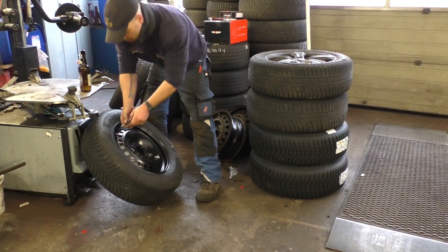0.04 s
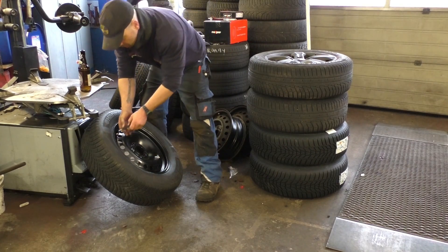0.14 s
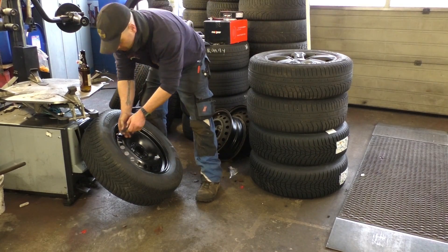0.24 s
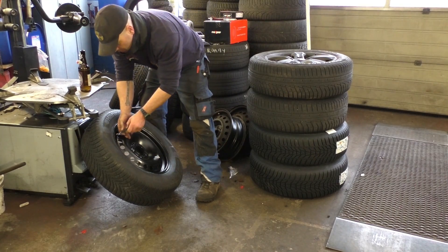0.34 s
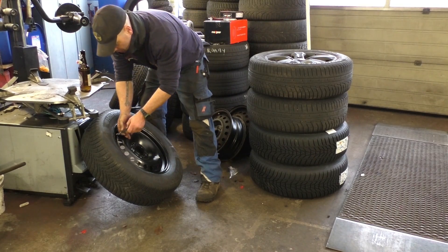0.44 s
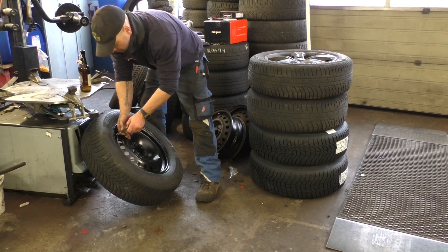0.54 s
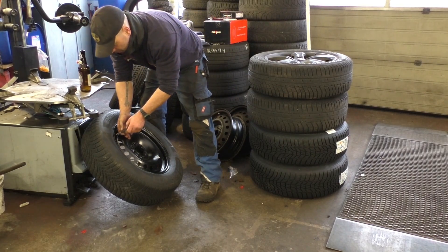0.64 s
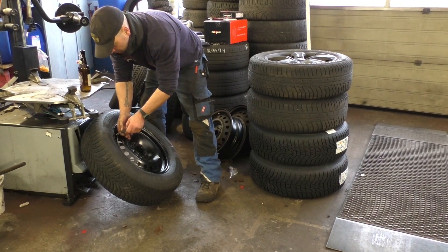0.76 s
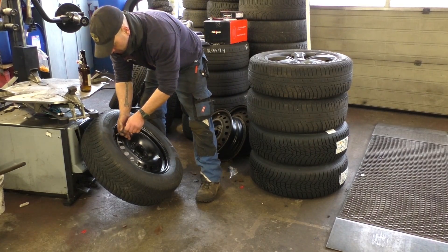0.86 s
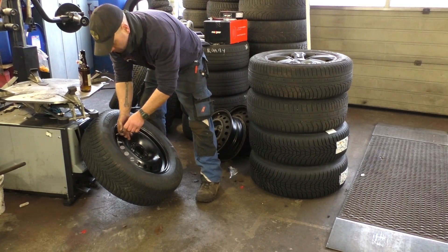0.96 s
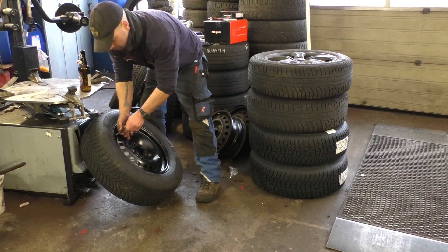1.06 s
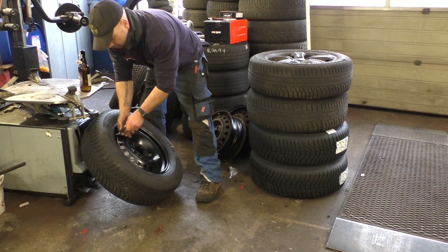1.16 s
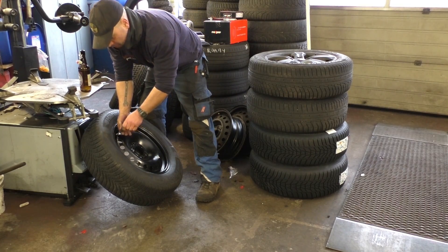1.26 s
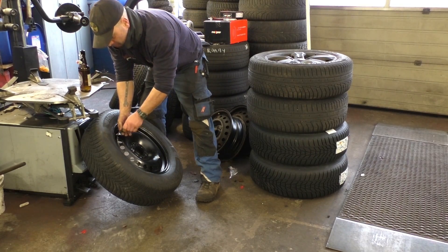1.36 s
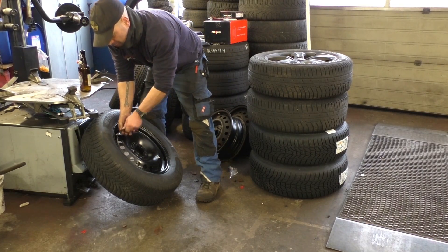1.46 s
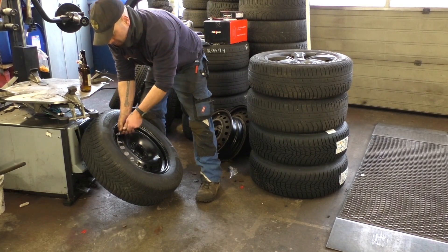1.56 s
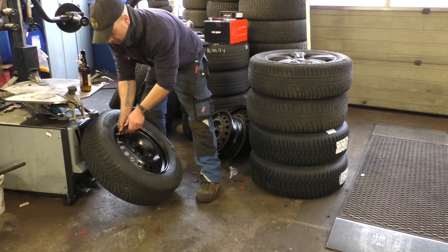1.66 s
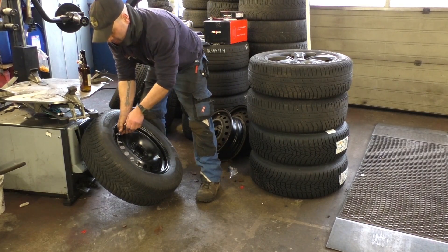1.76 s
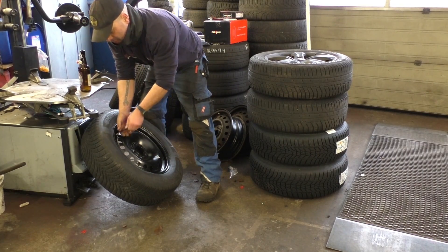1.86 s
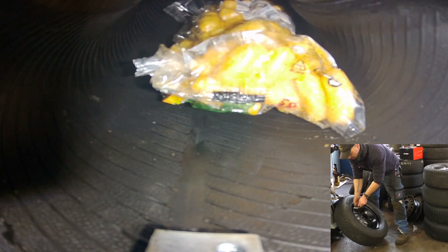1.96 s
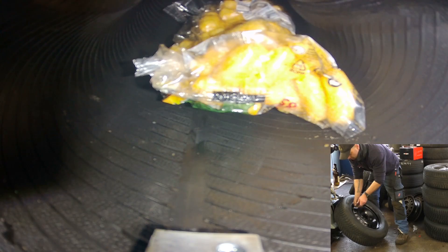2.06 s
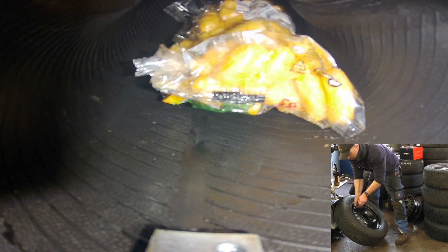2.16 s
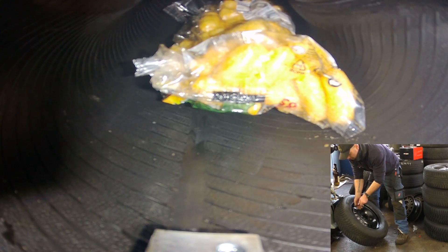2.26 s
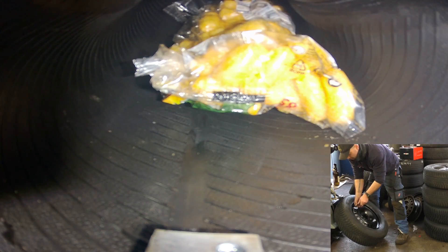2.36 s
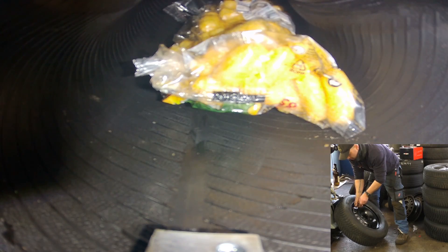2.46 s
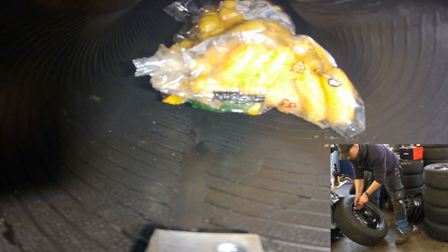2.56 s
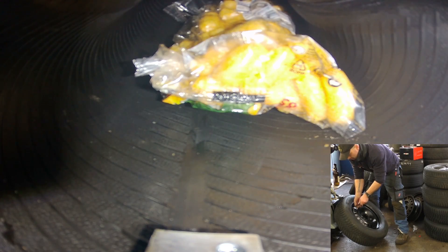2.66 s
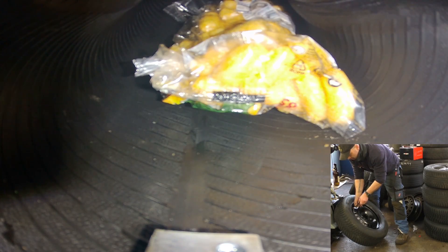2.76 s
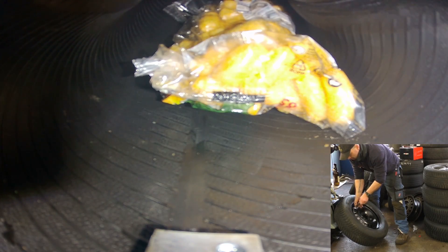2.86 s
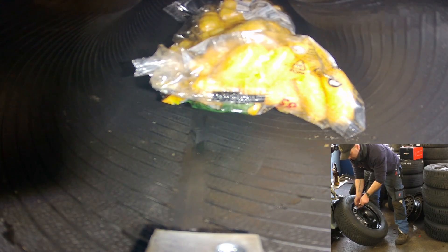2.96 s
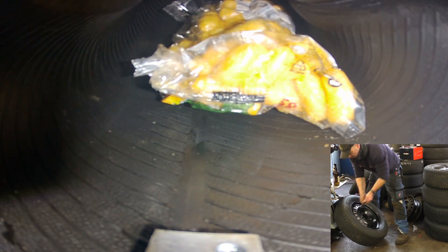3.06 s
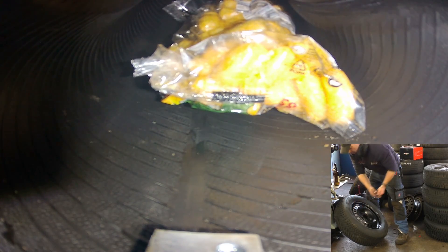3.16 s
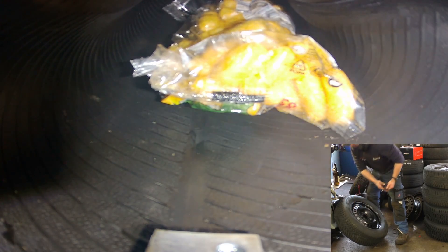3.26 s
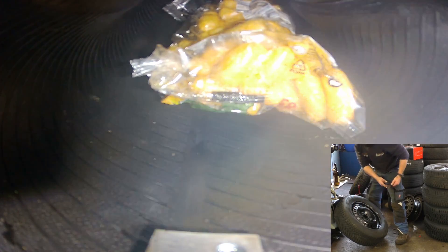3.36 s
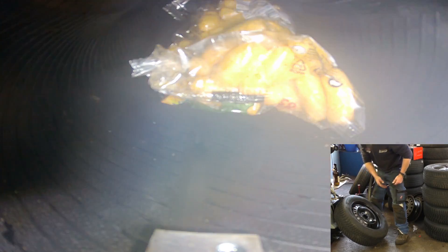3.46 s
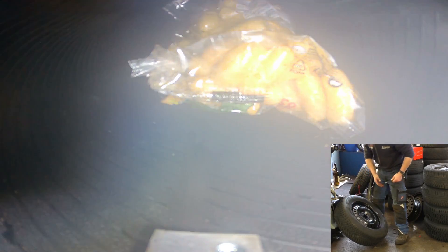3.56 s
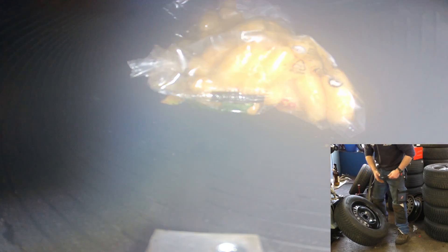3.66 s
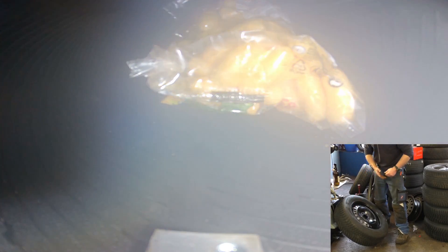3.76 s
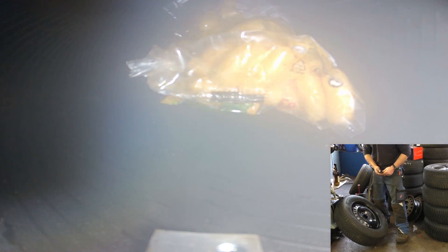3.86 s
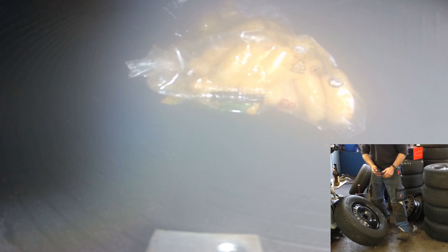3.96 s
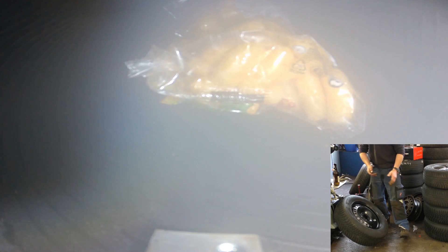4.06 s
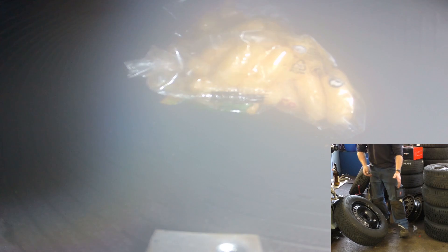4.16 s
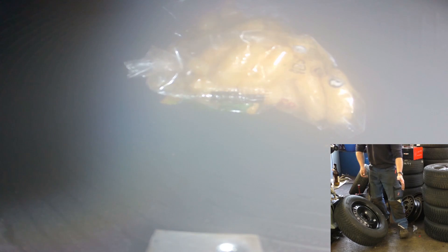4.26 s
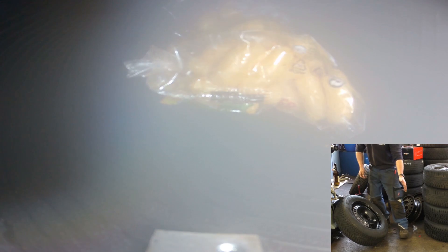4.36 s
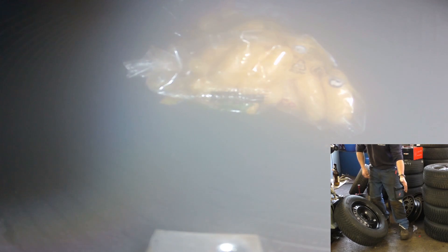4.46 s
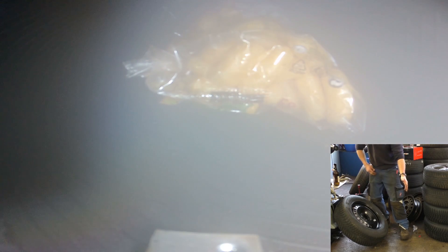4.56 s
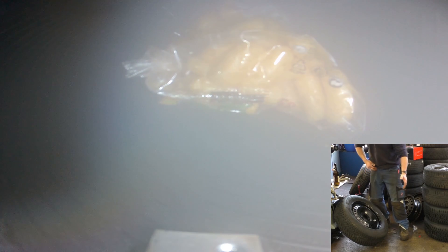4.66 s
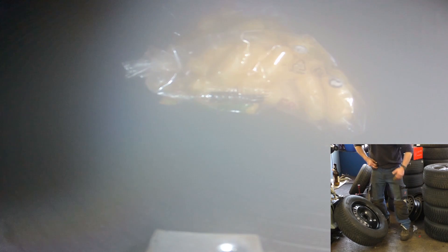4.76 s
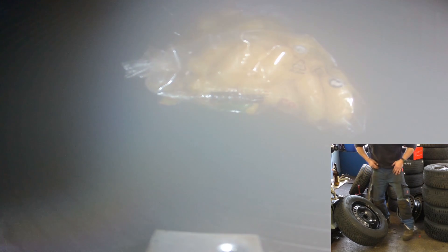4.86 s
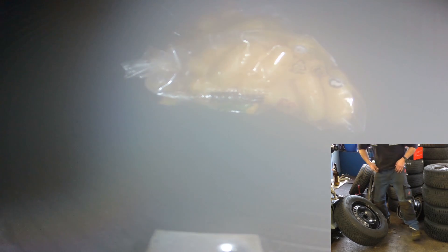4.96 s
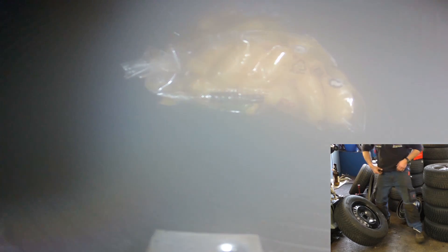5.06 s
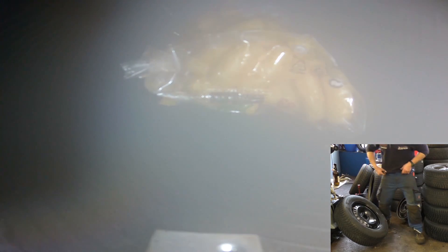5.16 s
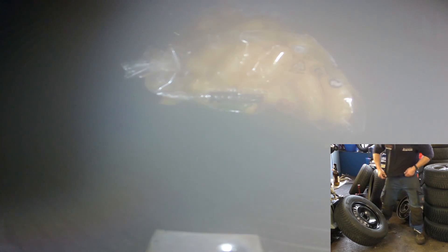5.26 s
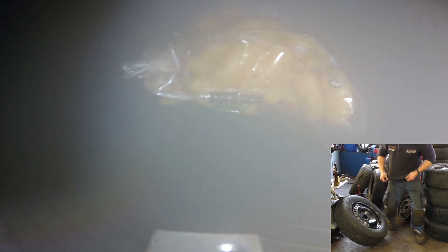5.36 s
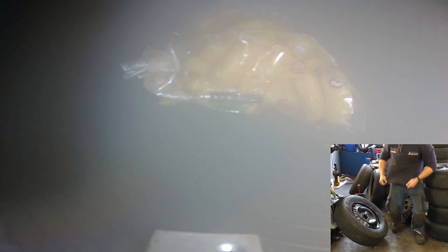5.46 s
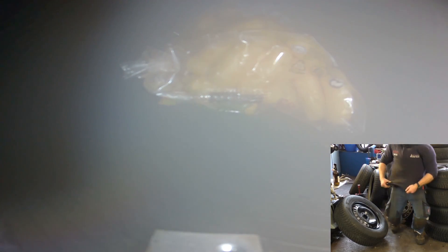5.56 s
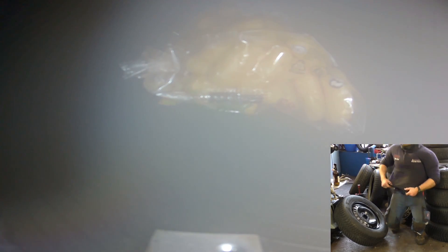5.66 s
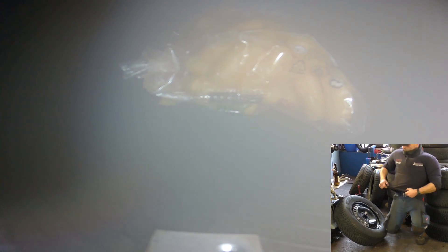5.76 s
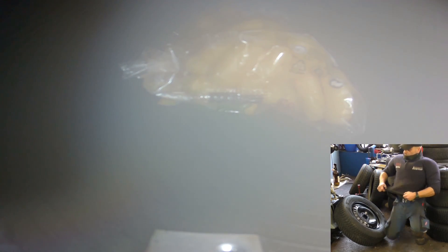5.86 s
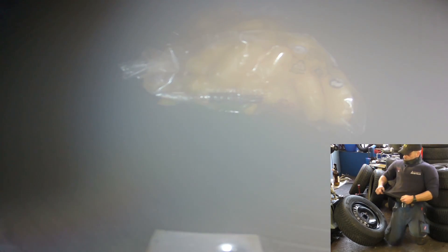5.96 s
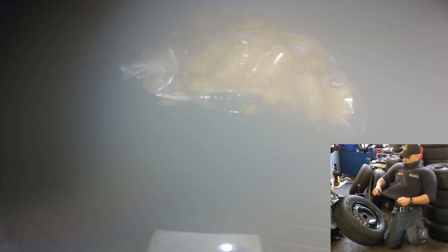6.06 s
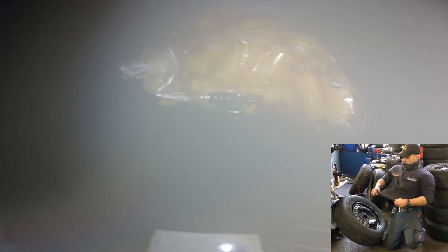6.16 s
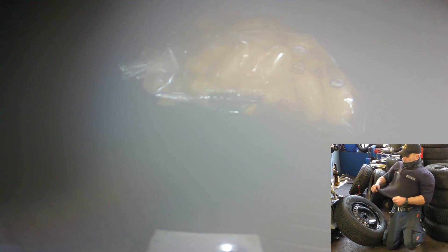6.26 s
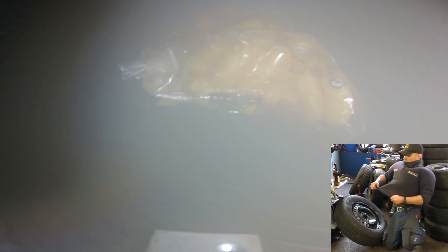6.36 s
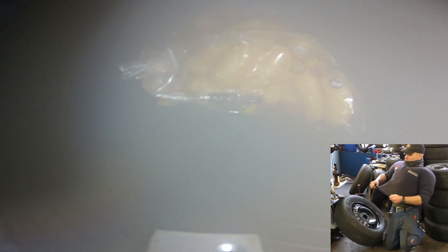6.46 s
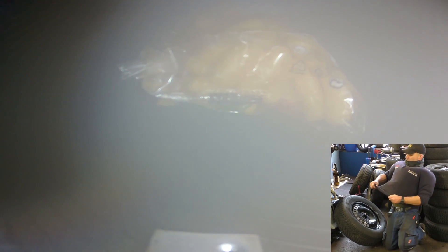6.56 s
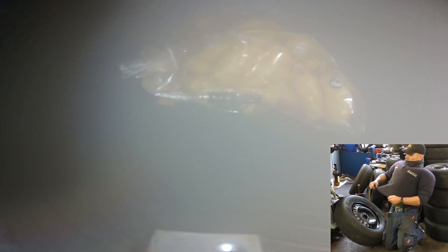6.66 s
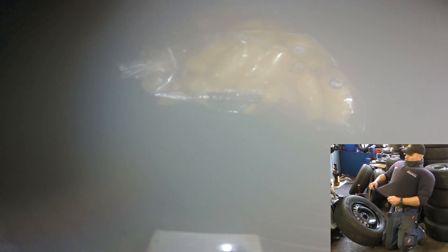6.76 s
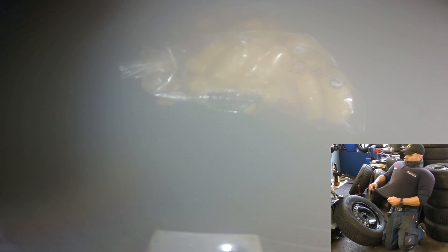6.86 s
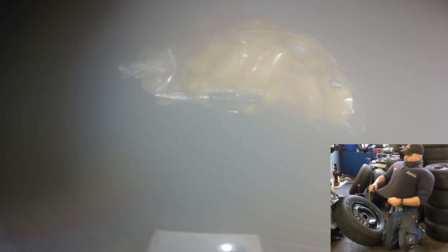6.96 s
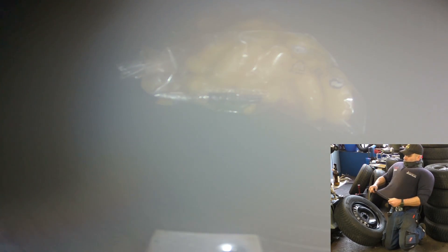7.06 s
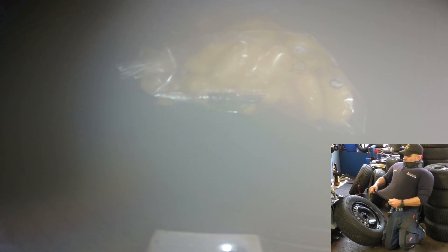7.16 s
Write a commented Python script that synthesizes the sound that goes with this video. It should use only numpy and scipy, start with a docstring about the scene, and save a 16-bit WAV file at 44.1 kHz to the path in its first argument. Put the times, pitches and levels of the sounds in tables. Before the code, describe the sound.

A tyre is deflated in a workshop, heard from inside it and from the room at once. At first there is low rumble, a faint drone and clothes shuffling. A valve tool knocks around 0.3, 0.65, 0.8, 1.05 and 1.4 seconds, each hit ringing short and hollow in the wheel, followed by a small tick in the room, some with a spit of air. From 1.6 seconds a thin, high leak fizzes and wavers. A strong knock at 2.8 leads to a sharp pop at 2.9, slightly left, and a blast of air. The jet swells at 3.1 with heavy low thumps and gusts buffeting the microphones until about 3.4, weaker ones after. Then a loud, bright, steady hiss with an airy whistle and soft hollow resonance continues, very slowly weakening, with faint knocks underneath until it ends at about 7.2 seconds.

```python
"""In a workshop a tyre is let down, taken by two microphones mixed together: one inside it, one in the room.
A valve tool knocks the wheel, the core leaks, then pops out and the jet hisses steadily as it slowly sags.
Inside, each knock rings the modes of wheel and air, and flow noise rings the hollow and the stem.
Outside, in stereo, shaped noise makes ticks, jet and workshop; low pushes and gusts buffet the ports."""
import sys
import numpy as np
from scipy import signal
from scipy.fft import rfft, irfft, next_fast_len
from scipy.io import wavfile
from scipy.ndimage import uniform_filter1d, map_coordinates

SR = 44100
rng = np.random.default_rng(int(sys.argv[2]) if len(sys.argv) > 2 else 0)


def wav_out(sig):
    """Save sig, one row per channel (or a flat mono array), as 16-bit PCM at SR to the path in sys.argv[1]."""
    wavfile.write(sys.argv[1], SR, np.round(np.clip(np.atleast_2d(sig).T, -1, 1) * 32767).astype(np.int16))


N = 318402

# Likeness of left and right at the room microphone: hz, likeness (1 is the same on both sides)
LEFT_RIGHT_LIKENESS = [(300, 1), (700, 1), (1100, 0.98), (2500, 0.43), (5200, 0.6), (5900, 0.96), (8200, 1),
                       (9000, 0.75), (15000, .55)]

POP_S = 2.906  # the core leaves the valve
SURGE_S = 3.09  # the flow swells once as the tool is pulled clear
SAG_DB_PER_S = 0.71  # the pressure falls slowly
VALVE_PAN_DB = 0.8  # left over right: the valve is left of centre


def amp(db):
    """Gain of a level in dB."""
    return 10 ** (np.asarray(db) / 20)


def unit(x):
    """x at rms 1."""
    return x / np.sqrt(np.mean(x ** 2) + 1e-20)


def along(points, hz):
    """(Hz, value) points read at hz along a log frequency axis."""
    f, v = np.transpose(points)
    return np.interp(np.log(hz + 1), np.log(f + 1), v)


def curves(rows):
    """One value per sample for each column after the time."""
    s, *columns = np.transpose(rows)
    return [np.interp(np.arange(N) / SR, s, column) for column in columns]


def wobble(rate):
    """A smooth random curve with rate knots a second."""
    knots = rng.standard_normal(int(N * rate / SR) + 4)
    return map_coordinates(knots, [np.arange(N) * rate / SR])


def filtered(x, response):
    """x through a response of frequency, real or complex."""
    n = x.shape[-1]
    m = next_fast_len(n + 8192)
    return irfft(rfft(x, m) * response(np.fft.rfftfreq(m, 1 / SR)), m)[..., :n]


def above(edge_hz):
    """Steep bass cut."""
    return lambda f: f ** 4 / (f ** 4 + edge_hz ** 4)


def resonances(modes):
    """Causal response of summed (Hz, width Hz, dB) resonances, alternating in sign."""
    def response(f):
        total = 0
        for k, (centre, width, db) in enumerate(modes):
            damping = 1j * f * width
            total = total + (-1) ** k * amp(db) * damping / (centre * centre - f * f + damping)
        return total
    return response


def panned(db):
    """Left and right gains for a level difference, left over right."""
    return amp(np.array([db / 2, -db / 2]))


def rush(spectrum, likeness, patchy_db=1.):
    """Stereo noise of rms 1, shaped in frequency, with patches of random gain in time and frequency."""
    z = signal.stft(rng.standard_normal((2, N)), nperseg=512)[2]
    patches = uniform_filter1d(rng.standard_normal(z.shape[1:]), 6, 0)
    patches = uniform_filter1d(patches, 12, 1)
    pair = signal.istft(z * amp(patchy_db * unit(patches)), nperseg=512)[1][:, :N]

    def mid_side(hz):
        # the angle shares the power so that left and right correlate by the wanted likeness
        turn = np.arccos(np.clip(along(likeness, hz), -1, 1)) / 2
        return amp(along(spectrum, hz)) * [np.cos(turn), np.sin(turn)]

    mid, side = filtered(pair, mid_side)
    return unit(np.array([mid + side, mid - side]))


def settling(from_s):
    """1 while the first flow is rough, then a smooth bell-shaped fall to 0."""
    settle_s = 0.23
    return np.exp(-(np.maximum(np.arange(N) / SR - from_s, 0) / settle_s) ** 2)


def workshop():
    """Rumble, drone and far hiss of the hall, with cloth and shoes shuffling nearby, all as shaped noise."""
    # Spectra of rumble and shuffle: hz, level_db
    rumble_spectrum = [(15, -14), (30, 0.5), (70, 0), (130, 2), (300, -48)]
    shuffle_spectrum = [(50, -80), (100, -16), (140, -4), (210, 1.5), (350, 0), (500, -7), (900, -73)]
    # Spectra of drone and far hiss: hz, density_db (per Hz)
    drone_spectrum = [(260, -54), (450, -10), (621, -10), (987, -0.5), (1100, 0.5), (1630, -1.5),
                      (2400, -4.5), (2620, -3.5), (5000, -32), (6500, -64), (11000, -120)]
    hiss_spectrum = [(1760, -34), (3000, -10), (3470, -5.5), (5390, -12.5), (6790, -15), (11500, -17.5),
                     (15900, -20.5)]
    # Levels through time of rumble and of shuffle: time_s, level_db
    rumbling = [(0, -60), (.4, -71), (1.5, -65.5), (1.85, -59.5), (2.2, -69), (3.1, -62), (4.5, -67),
                (5.6, -69.5), (6.25, -82), (6.6, -68.5), (7.22, -72)]
    shuffling = [(0, -52), (.3, -60), (.75, -65), (1.55, -60.5), (1.72, -48), (2, -54.5), (2.8, -54.5),
                 (3.1, -51), (3.45, -51.5), (3.65, -63), (4.4, -62), (4.8, -73), (5.09, -61), (5.3, -82),
                 (5.95, -59.5), (6.15, -45), (6.5, -57.5), (7.22, -62.5)]
    # Levels through time of the hall: time_s, drone_db, hiss_db
    hall = [(0.0, -49, -52.3), (0.372, -58, -64.5), (0.598, -59.5, -66), (0.86, -62, -66),
            (0.982, -59, -66.8), (1.212, -57, -55), (1.412, -59, -65.5), (1.56, -60.5, -58.8)]

    (rumble_db,), (shuffle_db,) = curves(rumbling), curves(shuffling)
    drone_db, hiss_db = curves(hall)
    rumble = amp(rumble_db + 4.5 * wobble(13)) * rush(rumble_spectrum, [(50, 0.92)], patchy_db=2.5)
    shuffle = amp(shuffle_db + 1.6 * wobble(18)) * rush(shuffle_spectrum, [(200, 0.96)], patchy_db=3.5)
    drone = filtered(rush(drone_spectrum, LEFT_RIGHT_LIKENESS, patchy_db=.5), above(200))
    hiss = filtered(rush(hiss_spectrum, LEFT_RIGHT_LIKENESS, patchy_db=.5), above(900))
    return rumble + shuffle + amp(drone_db) * drone + amp(hiss_db) * hiss


def knocks():
    """Inside the tyre: each knock rings the parts of the wheel; the contact chatters and scratches briefly."""
    # Knocks of the tool: start_s, level_db, then tread_db, air_ring_db, cavity_db, sidewall_db over that level
    knock_rows = [(0.294, -42, -12, -12, -10.5, -28), (0.334, -34, -22, -18, -21, -33),
                  (0.654, -51.5, -9, -1.5, -2, -20), (0.813, -34, -7.5, -13.5, -13, -32),
                  (1.043, -23.5, -11.5, -24, -18.5, -34), (1.388, -36, -4.5, -8.5, -16, -25),
                  (1.649, -55.5, -15, -11, 5, 2), (1.746, -56, 6, -9, 7, -21),
                  (2.357, -41, -27, -10, -3, -16), (2.693, -41, -12, -14, -9.5, -18),
                  (2.827, -19, -13, -5, -14, -23), (3.483, -35.5, -14, -28, -15.5, -11),
                  (3.844, -32, -22, -21, -17.5, -14), (4.304, -29.5, -27, -19, -30, -20),
                  (5.269, -31.5, -40, -20, -12, -14), (5.296, -33.5, -13, -41, -25, -9.5),
                  (5.579, -49, -10, -22, -24, -13), (5.722, -35.5, -20, -24, -33, -20),
                  (5.954, -41, -21, -17, -19, -6), (5.972, -36, -14, -18, -20, -15),
                  (6.033, -33, -26, -13, -28, -5), (6.642, -32.5, -27, -27, -20, -21),
                  (6.82, -46.5, 0, 3, -21, -21), (6.932, -35.5, -40, -17, -19, -13)]
    # Modes of the wheel: pitch_hz, level_db, t60_s
    wheel_modes = [(144, 1, 0.17), (217.2, 0.5, 0.33), (395, 1.5, 0.38), (575, 12, 0.047), (730, -26, 0.14),
                   (819, -4, 0.058), (895, 4, 0.037), (932, -18.5, 0.39), (967.5, 8, 0.035),
                   (992, -2.5, 0.05), (1084, -3.5, 0.065), (1168, -16, 0.057), (2680, -23, 0.025),
                   (2850, -19, .03), (2840, -17, 0.055), (3050, -5, 0.063), (3260, 18.5, 0.018),
                   (3461, -6, 0.1), (3546, -1, 0.075), (3580, -6, 0.044), (5380, -22, 0.099)]
    # Pitches dividing the modes into tread, ring of air, cavity, sidewall, body and rim: edge_hz
    part_edges_hz = [180, 300, 470, 780, 2000]
    # Scratch of metal on metal at the contact: centre_hz, width_hz, level_db
    scratch_modes = [(2700, 1100, -15), (4700, 1000, -4), (6740, 830, 1), (7760, 500, -6)]
    usual_db, rim_db, grows = -31.5, -17.5, 0.84  # rim at a usual knock; growth in dB per dB of knock
    seated_s, seeking_db, seated_db = .5, -7, -30.5  # scratches more until the tool sits on the core

    out, t = np.zeros(N + SR), np.arange(SR // 2) / SR
    hz, level, t60 = np.transpose(wheel_modes)
    part = np.digitize(hz, part_edges_hz)
    luck_db = rng.standard_normal((len(knock_rows), len(wheel_modes)))
    chatter = rng.standard_normal((len(knock_rows), SR // 50)) * amp(-30 - 60 * t[:SR // 50] / .03)
    chatter[:, 0] = 1
    chatter[:, round(.0052 * SR)] = 0.18  # the tool bounces once
    grit = unit(filtered(rng.standard_normal((len(knock_rows), len(t))), resonances(scratch_modes)))
    grit = grit * amp(-60 * t / 0.043)
    ring_rise = 1 - np.exp(-t / (0.0024 + 0.64 / hz[:, None]))  # low modes take longer to build up
    scratch_rise = 1 - np.exp(-t / 0.0018)
    for row, luck, contact, noise in zip(knock_rows, luck_db, chatter, grit):
        s, db, tread, air, cavity, sidewall = row
        harder_db = grows * (db - usual_db)
        rim = rim_db + harder_db
        scratch_db = seeking_db if s < seated_s else seated_db + harder_db
        strength = level + np.array([tread, air, cavity, sidewall, 0, rim])[part] + luck
        decay = amp(strength[:, None] - 60 * t / t60[:, None])
        ring = decay * np.sin(2 * np.pi * hz[:, None] * t) * ring_rise
        knock = signal.fftconvolve(ring.sum(0), contact)[:len(t)]
        knock = knock + amp(scratch_db) * noise * scratch_rise
        out[round(s * SR):][:len(t)] += amp(db) * knock
    return filtered(out[:N], above(70))


def walls():
    """A fresh stereo room tail of noise, left energy 1; each frequency dies at its own speed."""
    # Decay of the room: hz, t60_s
    wall_decay = [(500, 1), (2000, 0.35), (7000, 0.55), (15000, 0.35)]
    hz, t, z = signal.stft(rng.standard_normal((2, SR // 2)), SR, nperseg=256)
    decay = amp(-60 * t / along(wall_decay, hz)[:, None])
    tail = signal.istft(z * decay, SR, nperseg=256)[1][:, :SR // 2]
    return tail / np.linalg.norm(tail[0])


def ticks():
    """The tool on the valve from the room: a noise clack, a thin whistling leak, a spit of air, and the walls."""
    # Ticks: start_s, level_db, then leak_db and spit_db over that level
    tick_rows = [(0.3738, -55.5, -7, -22), (0.413, -45.5, -10.5, -18), (0.7294, -69.5, -29, -20),
                 (0.8936, -49, -38, -25), (1.1235, -41, -29, 3), (1.468, -55, -30, -19),
                 (1.568, -46, -27, -0.5)]
    # Spectrum of the clack: hz, level_db
    clack_spectrum = [(300, -1), (800, -27), (1100, 16), (1500, 3), (2500, -18), (4500, -4), (5500, -17),
                      (9000, -8), (16000, -9)]
    # Air leaking past the tool: centre_hz, width_hz, level_db
    leak_modes = [(6900, 500, -3), (7130, 280, -2), (9300, 400, -7)]
    # A puff past the seal: centre_hz, width_hz, level_db
    spit_modes = [(4200, 800, 5.5), (9130, 820, 11.5), (14600, 4000, -2)]
    room_db = 2.5  # walls over the direct sound

    out, t = np.zeros((2, N + SR)), np.arange(SR // 2) / SR
    snap = 1 + 1.5 * amp(-60 * t / .006)  # the first instant is the hardest
    for s, db, leak_db, spit_db in tick_rows:
        noise = rng.standard_normal((3, len(t)))
        clack = unit(filtered(noise[0], lambda f: amp(along(clack_spectrum, f)))) * amp(-60 * t / 0.055)
        leak = unit(filtered(noise[1], resonances(leak_modes))) * amp(leak_db - 60 * t / 0.27)
        spit = unit(filtered(noise[2], resonances(spit_modes))) * amp(spit_db - 60 * t / 0.12)
        direct = amp(db) * (clack + leak + spit) * snap
        echo = amp(room_db) * signal.fftconvolve(direct[None], walls(), axes=1)[:, :len(t)]
        out[:, round(s * SR):][:, :len(t)] += panned(VALVE_PAN_DB)[:, None] * direct + echo
    return out[:, :N]


def nearby(x):
    """Echoes of the hall comb the jet finely; the response, direct sound included, has energy 1."""
    echo_db, t60_s, delay_s = -8.5, .25, .01  # echo level is against the direct sound
    t = np.arange(SR // 2) / SR
    tail = rng.standard_normal(len(t)) * amp(-60 * t / t60_s) * (t > delay_s)
    tail = amp(echo_db) * tail / np.linalg.norm(tail)
    tail[0] = 1  # direct sound
    return signal.fftconvolve(x, tail[None] / np.linalg.norm(tail), axes=1)[:, :N]


def jet():
    """Turbulent noise at the valve: a leak past the core, a blast as it leaves, a flow that swells and sags."""
    # The leak as the core is unscrewed: time_s, fizz_db, body_db
    leaking = [(1.575, -45.5, -48.5), (1.66, -38.5, -47.5), (1.69, -35.5, -40), (1.733, -32, -37.5),
               (1.937, -33.5, -41), (2.055, -39.5, -45), (2.215, -41, -47.5), (2.229, -34.5, -42.5),
               (2.413, -38.5, -47), (2.465, -35, -39.5), (2.547, -35, -41), (2.715, -41.5, -46),
               (2.815, -37.5, -41.5), (2.83, -35, -31.5), (2.9, -31.5, -31)]
    # Spectra past the loosened core, through the open stem, of the body, and at full pressure:
    # hz, density_db (per Hz)
    leak_spectrum = [(1760, -32), (3000, -30), (3900, -15), (5750, 1), (7480, -0.5), (8650, 3.5),
                     (11700, 3), (12900, 0.5), (15200, 2.5), (15700, -8)]
    fizz_spectrum = [(1760, -33), (3000, -12), (4070, -5.5), (5040, -6), (6210, -4), (7330, -4), (9800, 0),
                     (12900, -1.5), (15100, -6), (15700, -9)]
    body_spectrum = [(650, -9.5), (1100, -8.5), (1380, -3), (3100, -2), (5020, -4.5), (6000, -14),
                     (7800, -18), (13200, -120)]
    blast_spectrum = [(2400, -40), (4000, -13), (7300, -10), (10000, 0), (12000, -3), (14000, -1),
                      (15700, -3)]
    flow_fizz_db, flow_body_db, flow_pan_db = -21.5, -40.5, 0.3  # fizz before the sag; body once settled
    rough_body_db = 12  # extra body in the rough first flow
    surge_width_s, surge_peak_db = 0.04, 3
    blast_db, blast_pan_db = -13.5, 4
    blast_rise_s, blast_hold_s, blast_t60_s = .008, .012, .05

    t = np.arange(N) / SR
    core_out, since = t > POP_S, np.maximum(t - POP_S, 0)
    leak_fizz_db, leak_body_db = curves(leaking)
    surge_db = surge_peak_db * np.exp(-((t - SURGE_S) / surge_width_s) ** 2)
    open_fizz_db = flow_fizz_db - SAG_DB_PER_S * since + surge_db
    open_body_db = flow_body_db + rough_body_db * settling(SURGE_S) + surge_db
    fizz_db = np.where(core_out, open_fizz_db, leak_fizz_db)
    body_db = np.where(core_out, open_body_db, leak_body_db)
    flutter_db = 0.47 * wobble(11) + 0.38 * wobble(40)

    open_noise = rush(fizz_spectrum, LEFT_RIGHT_LIKENESS, patchy_db=.5)
    leak_noise = rush(leak_spectrum, LEFT_RIGHT_LIKENESS, patchy_db=1.5)
    rise = np.minimum(since / blast_rise_s, 1)
    fizz = amp(fizz_db + flutter_db) * np.where(core_out, open_noise, leak_noise)
    fizz = fizz * np.where(core_out, rise, 1)
    body = amp(body_db + flutter_db) * rush(body_spectrum, LEFT_RIGHT_LIKENESS, patchy_db=1.57)
    fall_db = -60 * np.maximum(since - blast_rise_s - blast_hold_s, 0) / blast_t60_s
    blast = rise * amp(blast_db + fall_db) * rush(blast_spectrum, LEFT_RIGHT_LIKENESS, patchy_db=1.0)
    blast = blast * panned(blast_pan_db)[:, None]
    stream = panned(np.where(core_out, flow_pan_db, VALVE_PAN_DB)) * (fizz + body)
    return (t > leaking[0][0]) * filtered(nearby(stream) + blast, above(620))


def buffeting():
    """Eddies of the jet hit each microphone port: single low pushes or pulls, each inside a lumpy gust."""
    # Pushes on the ports: start_s, level_db, left_right_db, together (1 same way on both ports, -1 opposed)
    puffs = [(2.829, -19, 0, 1), (2.91, -22, -4, 1), (3.087, -8.5, 3, 1), (3.155, -8.5, -1, -1),
             (3.17, -14.5, -10, 1), (3.193, -17.5, -6, 1), (3.26, -30, 2, 1), (3.305, -30, -9, 1),
             (3.406, -33, -11, 1), (3.693, -30, 2, 1), (4.031, -38, 2, 1), (4.171, -30.5, 4, 1),
             (4.276, -35, 0, 1), (4.303, -38, -10, 1), (4.487, -45, 0, 1)]
    # Spectrum of the eddies: hz, level_db
    eddy_spectrum = [(15, -13), (40, -15), (120, -6), (300, -8), (600, -18), (1200, -70)]
    push_s = 0.0011  # time constant of a push
    gust_db, gust_rise_s, gust_t60_s = -19, 0.012, 0.26  # level against its push; rises ahead of it

    lumps = amp(3.0 * np.array([wobble(40), wobble(40)]))  # each port has its own
    eddies = unit(lumps * rush(eddy_spectrum, [(50, 0.046)], patchy_db=6.5))
    pushes, gust, t = np.zeros((2, N)), np.zeros(N), np.arange(N) / SR
    push_or_pull = rng.choice([-1, 1], size=len(puffs))
    for (s, db, pan_db, together), way in zip(puffs, push_or_pull):
        after, before = np.maximum(t - s, 0), np.minimum(t - s, 0)
        u = after / push_s
        ports = way * panned(pan_db) * [np.sign(together), 1]
        pushes += amp(db) * ports[:, None] * u * (2 - u) * np.exp(-u)
        gust += amp(db + gust_db - 60 * after / gust_t60_s) * np.exp(before / gust_rise_s)
    return gust * eddies + pushes


def draught():
    """Inside, once the core is loose: rushing air excites the hollow of the tyre and whistles in the stem."""
    # Hollow of the tyre: centre_hz, width_hz, level_db (for one pass of the filter)
    hollow_modes = [(196, 79, -6.5), (381, 49, -4.5), (590, 125, -8), (772, 70, -5), (894.4, 30.5, 2),
                    (951, 41, 3.5), (1069, 220, -0.5)]
    # Pipe of the valve stem: centre_hz, width_hz, level_db
    stem_modes = [(1910, 900, -6.5), (3080, 610, -1.5), (6330, 200, 5)]
    loose_s = 2.832  # air starts to move inside
    settled_hollow_db, rough_hollow_db, hollow_hold_s = -46, 12.5, 2.98  # the hollow calms a little sooner
    pop_whistle_db, rough_whistle_db = -36.5, 2.5  # whistle at the pop, without its rough extra

    t = np.arange(N) / SR
    hollow_db = settled_hollow_db + rough_hollow_db * settling(hollow_hold_s)
    whistle_db = pop_whistle_db - SAG_DB_PER_S * (t - POP_S) + rough_whistle_db * settling(SURGE_S)
    hollow_ring = resonances(hollow_modes)
    hollow = filtered(rng.standard_normal(N) * amp(0.21 * wobble(30)), hollow_ring)
    # a second, gentler pass leaves it dark between the modes
    hollow = filtered(hollow, lambda f: above(150)(f) * np.abs(hollow_ring(f)) ** 0.59)
    whistle = filtered(rng.standard_normal(N), resonances(stem_modes))
    whistle = filtered(whistle, above(800))
    return (t > loose_s) * (amp(hollow_db) * unit(hollow) + amp(whistle_db) * unit(whistle))


def pop():
    """The core pops out: a sharp click and a short gush of noise ring the stem, placed to the left."""
    # The core leaving its seat: centre_hz, width_hz, level_db
    seat_modes = [(1300, 200, -3), (2020, 130, 5.5), (2700, 1200, -8.5)]
    pop_db, pan_db = -6.5, 8
    out, t = np.zeros(N), np.arange(SR // 4) / SR
    click, gush = 3 * amp(-60 * t / .008), .5 * amp(-60 * t / .3)
    out[round(POP_S * SR):][:len(t)] = (click + gush) * rng.standard_normal(len(t))
    return amp(pop_db) * panned(pan_db)[:, None] * filtered(out, resonances(seat_modes))


def scene():
    """The microphone inside the tyre (knocks, draught) is mono, the one in the room stereo."""
    inside = knocks() + draught()
    room = ticks() + pop() + jet() + buffeting() + workshop()
    return inside + room


def record(dry):
    """Nothing is kept from the band limit up."""
    top_hz = 15750
    return filtered(dry, lambda hz: hz < top_hz)


dry = scene()
out = record(dry)
wav_out(out)
```